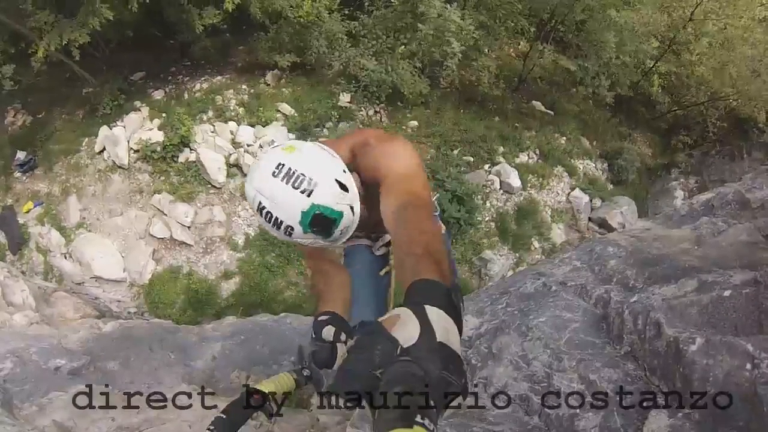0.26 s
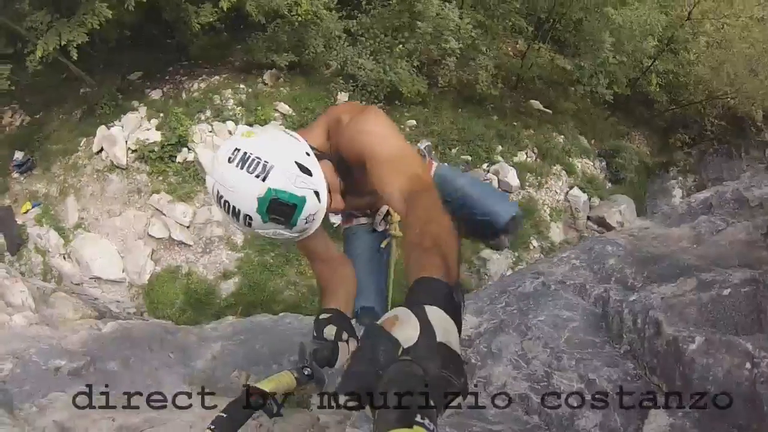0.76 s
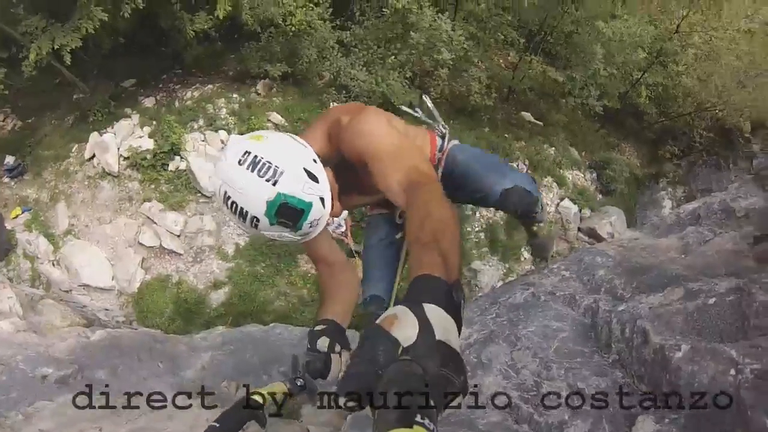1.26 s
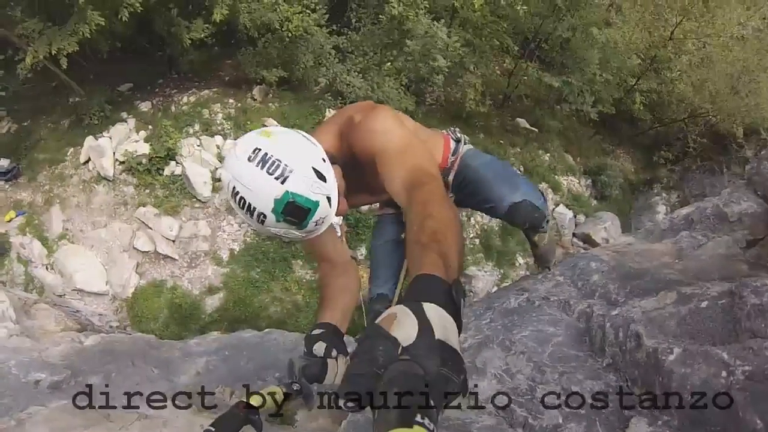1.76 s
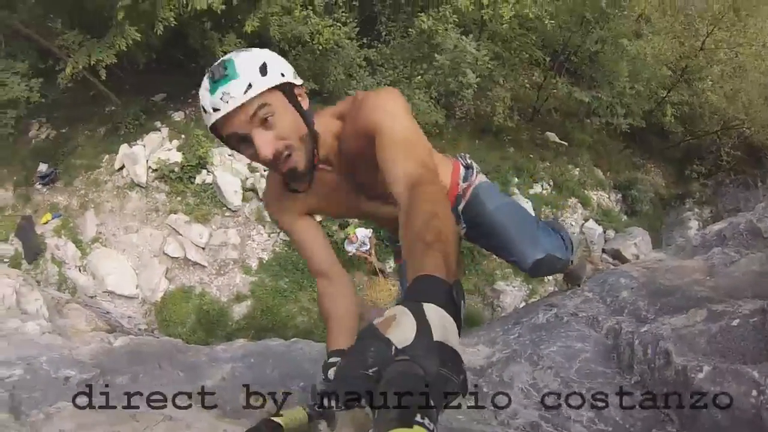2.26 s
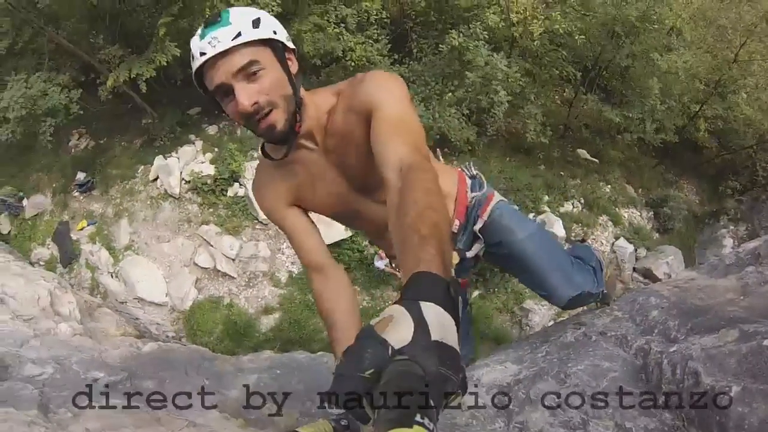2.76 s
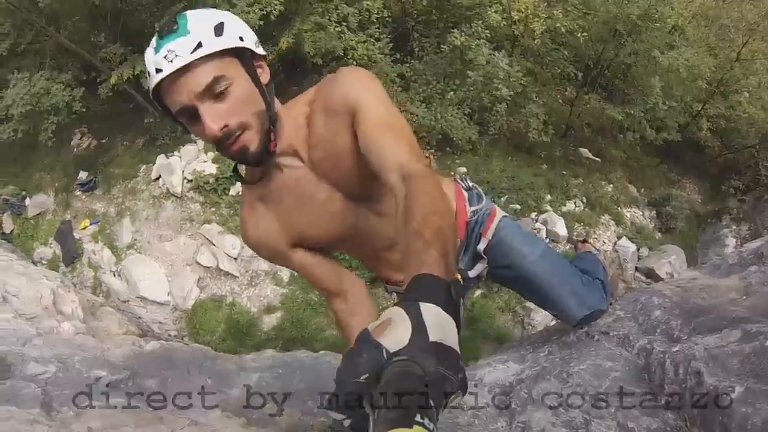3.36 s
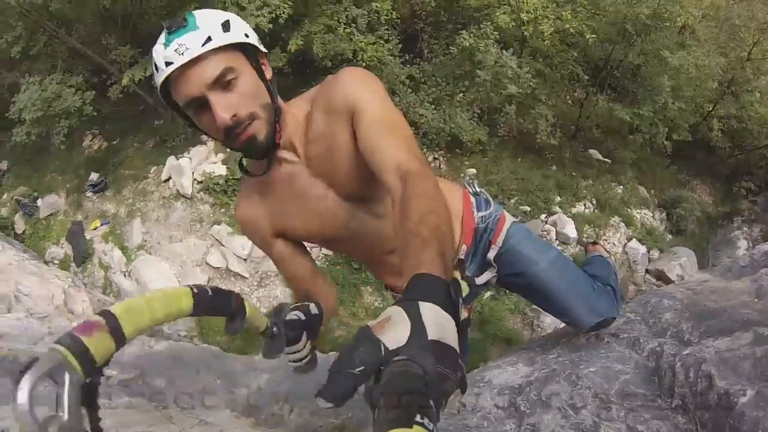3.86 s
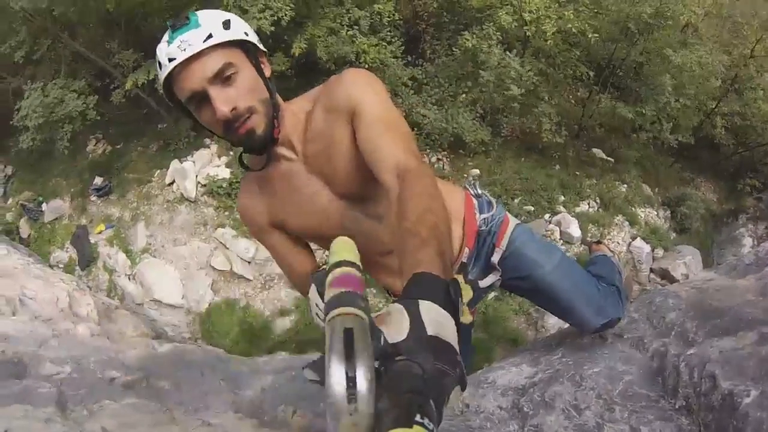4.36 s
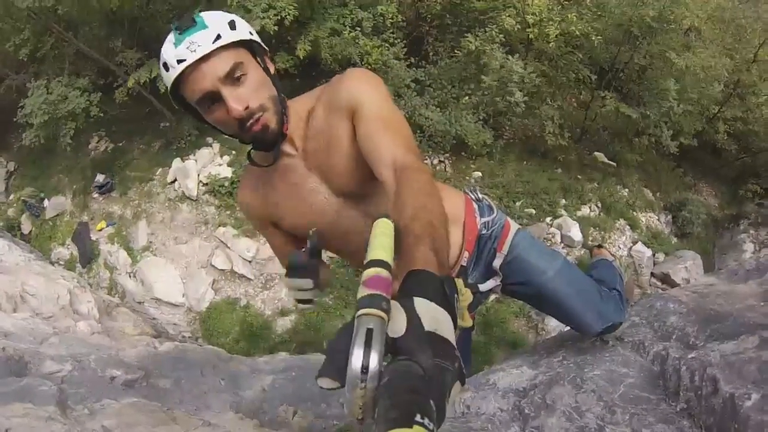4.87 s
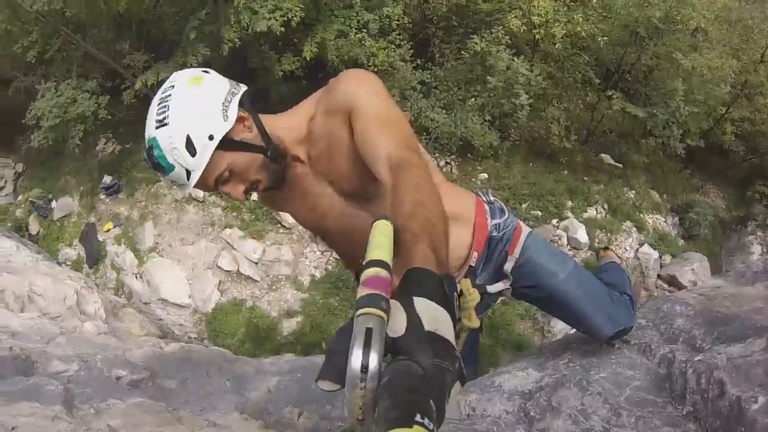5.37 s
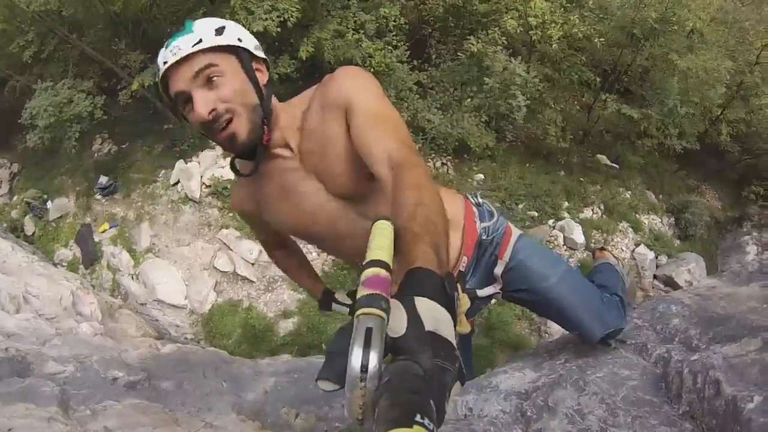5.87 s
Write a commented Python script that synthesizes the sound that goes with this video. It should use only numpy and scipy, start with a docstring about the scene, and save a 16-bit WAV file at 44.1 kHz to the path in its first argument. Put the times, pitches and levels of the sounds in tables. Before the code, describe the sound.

Faint shoe scuffs, taps and hardware ticks over low wind rumble, then a metal climbing tool slams into rock with a loud clack and rattle.

```python
"""A small camera rides on a climbing tool hooked into a rock face, so knocks reach it through the shaft.
Wind rumbles on the port over the hush of a wooded valley; a shoe squeaks, scuffs and taps for a foothold,
ringing the tool's decaying modes, while cloth rustles and harness hardware and grit tick in filtered noise.
One far bird whistles a gliding sine, then a second tool slams in, skitters and drops flat against the rock;
last a glove slides off its grip, noise rubbed through broad resonances."""
import sys
import numpy as np
from scipy import signal
from scipy.fft import rfft, irfft
from scipy.io import wavfile
from scipy.ndimage import uniform_filter1d

SR = 44100
rng = np.random.default_rng(int(sys.argv[2]) if len(sys.argv) > 2 else 0)


def volts_from_decibels(level):
    """Turn decibel levels (scalar or array-like) into linear amplitude factors."""
    exponent = np.asarray(level, float) / 20
    return 10 ** exponent


def generate_wav(signal):
    """Clip the signal to [-1, 1] and save it as 16-bit WAV at the path in sys.argv[1]."""
    frames = np.transpose(np.atleast_2d(signal))
    scaled = np.clip(frames, -1, 1) * 32767
    pcm = np.round(scaled).astype(np.int16)
    wavfile.write(sys.argv[1], SR, pcm)


N = 269892
T = np.arange(N) / SR

# modes of the shaft: pitch_hz, relative_level_db, nominal_t60_s
SHAFT = [(585, -21.5, 0.025), (792.7, 5.5, 0.035), (890, 0.5, 0.034), (1031, -6.5, 0.024)]
# low thud of tool and mount: pitch_hz, relative_level_db, nominal_t60_s
THUD = [(272.5, -3.5, 0.032), (325, -1, 0.054), (391.6, -4.5, .052), (461, -4.5, 0.022)]
# clack of the pick: pitch_hz, relative_level_db, nominal_t60_s
PICK = [(1147, -4.5, 0.017), (1488, -2.5, 0.012), (1595, 3, 0.021), (1795, 1.5, 0.014), (1900, 1.5, 0.016),
        (2234, -0.5, 0.014), (2430, -2, 0.014), (2540, -7.5, 0.014), (2787, -6, 0.01306), (3125, -7, 0.011),
        (4747, -18, .014)]
# the second tool slams in tip first: start_s, shaft_db, thud_over_shaft_db, clack_over_shaft_db, contact_ms
BLOWS = [(4.3884, -13, -2, 1, 0.69), (4.3944, -14, -20, 1, .6), (4.399, -30, -17, 4, 0.51)]
# its shaft drops flat on the rock: start_s, shaft_db, clack_over_shaft_db, sustain_factor, favoured_shaft_hz
BUMPS = [(4.6055, -17.5, -17.5, 0.82, 870), (4.7916, -27, -14.5, 1.44, 1023)]
# pitch around which a dry tick is brightest, of harness parts and of grit as bright as they are
BUCKLE_HZ, CLIP_HZ, GATE_HZ = 5340, 7100, 10030
SHOE_PICK_HZ = 1740  # shoes favour the middle of the pick
BLOW_GRIT_DB = -12.0  # grit under the clack, for blows and flat bumps


def blows():
    """Tip-first slams: smooth pushes favour the top of the shaft ring and the lowest thud modes."""
    return sum(knock(start_s, shaft_db, shaft_db + thud_db, shaft_db + clack_db,
                     shaft_db + clack_db + BLOW_GRIT_DB, ms, kind="clean", shaft_hz=1074, thud_hz=310)
               for start_s, shaft_db, thud_db, clack_db, ms in BLOWS)


def skitter():
    """The tip skips over the rock: each skip clacks some pick modes and barely stirs the shaft."""
    # start_s, clack_db, contact_ms, favoured_pick_hz
    skips = [(4.407, -20, 0.77, 2200), (4.4107, -34, 1.5, 1580), (4.4265, -20.5, 0.7, 2300),
             (4.4361, -28.5, .6, 2300), (4.453, -22.5, 0.61, 2300), (4.4558, -25, 1.2, 1500),
             (4.4592, -29, .8, 4600), (4.4751, -23.5, 0.87, 2010), (4.495, -33.5, 1.5, 1500),
             (4.501, -38, 2.5, 2200), (4.507, -48, 1.5, 1700), (4.516, -39, 2.1, 1500),
             (4.533, -51, 1.3, 1920), (4.572, -56, 1.8, 1690), (4.627, -44, 2.1, 1700),
             (4.642, -44.5, 1.3, 1510), (4.659, -50, 4.9, 1700), (4.667, -50, 3.3, 2100),
             (4.694, -47, 3.7, 1910)]
    return sum(knock(start_s, db - 20.5, db - 33, db, db - 23, ms, pick_hz=hz, onset=0.15)
               for start_s, db, ms, hz in skips)


def flat_bumps():
    """The shaft drops flat: it bends the other way from a blow and rattles longer."""
    return sum(knock(start_s, shaft_db, shaft_db - 5, shaft_db + clack_db, shaft_db + clack_db + BLOW_GRIT_DB,
                     0.28, sustain=sustain, kind="flat", shaft_hz=hz, thud_hz=393)
               for start_s, shaft_db, clack_db, sustain, hz in BUMPS)


def mount_sway():
    """The mount sways in low modes after the first blow and the flat bumps, for less time the softer they are."""
    # pitch_hz, relative_level_db, nominal_t60_s
    mount = [(53.4, -8, .3), (80.5, 0.5, 0.21), (122, -2.5, .12)]
    out = np.zeros(N)
    first_db = BLOWS[0][1]
    for start_s, shaft_db, *_ in BLOWS[:1] + BUMPS:
        sway = ring(mount, spread_db=1.5, sustain=volts_from_decibels(0.63 * (shaft_db - first_db)))
        add(out, start_s, sway, shaft_db - 18)
    return out


def shoe_taps():
    """Shoe taps felt through the rock: rough contacts ring the same tool."""
    # start_s, shaft_db, clack_over_shaft_db, contact_ms
    steps = [(.371, -54.5, -6, 3.2), (.442, -46.5, -12, 2.4), (0.466, -40.5, -7.5, 1.45),
             (.498, -44.5, 3, 2.1), (.827, -49.5, -12, 3), (1.100, -38.5, -7, 4.6), (1.12, -54.5, -20, 3.4),
             (1.178, -53, -11, 4.7), (1.193, -51.5, -6.5, 2.8), (1.264, -63, 5, 4.2),
             (1.368, -30.5, -17, 3.1), (1.379, -29.5, -14.5, 2.5), (1.498, -40, -8, 5.8),
             (1.668, -35.5, -2.5, 2.4), (1.73, -56, -6, 3.2), (1.743, -51.5, -6, 3),
             (1.777, -40.5, -10, 1.7), (1.786, -50, 1.5, 4.7), (1.855, -30.5, -11, 2.17),
             (3.275, -56, -6, 3.1)]
    return sum(knock(start_s, shaft_db, shaft_db - 8.5, shaft_db + clack_db, shaft_db + clack_db - 19.5,
                     ms, pick_hz=SHOE_PICK_HZ)
               for start_s, shaft_db, clack_db, ms in steps)


def scuffs():
    """Rubber catching and slipping on rock: grains come in lumps and ring the same modes."""
    # peak_s, rise_ms, fall_ms, shaft_db, clack_over_shaft_db
    drags = [(.52, 77, 110, -69.5, 2), (.586, 13, 15, -65, 11.5), (0.604, 20.4, 36.3, -40.5, -8),
             (0.845, 26, 34.5, -44.5, -12), (.885, 19, 45, -61.5, -6.5), (1.374, 19, 22, -43.5, -7.5),
             (2.12, 31, 51, -62, -6.5), (2.43, 210, 170, -70, -2.5)]
    grains = rng.standard_normal(N) * volts_from_decibels(1.3 * rng.exponential(size=N)) * lumps(3.5, spread_db=4.5)
    pick_ring = ring(PICK, sustain=1.35, near_hz=SHOE_PICK_HZ, off_db=-22)
    shaft, thud, pick = [unit(signal.fftconvolve(grains, response)[:N])
                         for response in (ring(SHAFT), ring(THUD), pick_ring)]
    body = shaft + volts_from_decibels(-10.5) * thud
    tip = pick + volts_from_decibels(-12.5) * unit(band(grains, 4150, 5060))
    return sum(swell(peak_s, rise_ms, fall_ms, db, bend=1.6) * (body + volts_from_decibels(clack_db) * tip)
               for peak_s, rise_ms, fall_ms, db, clack_db in drags)


def glove():
    """Grainy rubbing through the broad resonances of the grip."""
    # peak_s, rise_ms, fall_ms, level_db
    slide = (4.92, 74, 60, -54.5)
    # centre_hz, width_hz, relative_level_db
    grip = [(905, 205, 6), (1056, 170, 2.5), (1220, 57, -0.5), (1800, 230, -7), (2900, 330, -16),
            (4420, 410, -7.5), (5060, 450, -6.5), (6100, 400, -13.5), (6980, 430, -16),
            (10100, 5400, -24.5)]
    rub = rng.standard_normal(N) * lumps(1.7, spread_db=2.0)
    rung = sum(volts_from_decibels(db) * band(rub, hz - width / 2, hz + width / 2) for hz, width, db in grip)
    return swell(*slide, bend=2.6) * unit(rung)


def dry_ticks():
    """Dry bright ticks: harness hardware, and grit crackling under scuff, blows, skips and bumps."""
    # start_s, peak_db, brightest_hz
    ticks = [(0.7247, -50, GATE_HZ), (0.752, -51.5, BUCKLE_HZ), (.769, -51.5, GATE_HZ),
             (0.9262, -50.5, BUCKLE_HZ), (0.996, -63, BUCKLE_HZ), (1.094, -57, CLIP_HZ),
             (1.126, -52.5, GATE_HZ), (1.372, -47, BUCKLE_HZ), (1.416, -56.5, BUCKLE_HZ),
             (1.502, -45.5, BUCKLE_HZ), (1.532, -56, BUCKLE_HZ), (1.547, -59, CLIP_HZ),
             (1.559, -51, GATE_HZ), (1.574, -45, BUCKLE_HZ), (1.792, -58.5, CLIP_HZ),
             (2.015, -66, BUCKLE_HZ), (2.18, -63, BUCKLE_HZ), (2.439, -67, BUCKLE_HZ),
             (2.579, -61, BUCKLE_HZ), (2.61, -61.5, BUCKLE_HZ), (3.0724, -55, CLIP_HZ),
             (3.094, -54.5, BUCKLE_HZ), (3.1713, -59, BUCKLE_HZ), (3.2, -54.5, BUCKLE_HZ),
             (3.296, -54.5, BUCKLE_HZ), (3.3484, -65, CLIP_HZ), (3.943, -52.5, CLIP_HZ),
             (4.0086, -47.5, BUCKLE_HZ), (4.0243, -56, BUCKLE_HZ), (4.118, -64, BUCKLE_HZ),
             (4.418, -45, CLIP_HZ), (4.4707, -45, CLIP_HZ), (4.642, -44, CLIP_HZ), (4.607, -37, GATE_HZ),
             (4.616, -47.5, CLIP_HZ), (4.624, -65, GATE_HZ), (4.734, -62, CLIP_HZ), (4.749, -68, GATE_HZ),
             (4.794, -50.5, GATE_HZ), (4.8, -55, GATE_HZ), (4.805, -51, CLIP_HZ), (5.1126, -64, BUCKLE_HZ),
             (5.5192, -62, CLIP_HZ), (5.651, -61.5, BUCKLE_HZ), (5.813, -53, GATE_HZ),
             (5.872, -56.5, CLIP_HZ), (5.925, -60.5, CLIP_HZ)]
    out = np.zeros(N)
    for start_s, db, hz in ticks:
        force = contact(6.4, rough=3.3, swell=0.14)
        broad = band(force, 0.5 * hz, 10500)
        bright = band(force, 0.9 * hz, 1.1 * hz)
        add(out, start_s, broad + volts_from_decibels(-1.5) * bright, db)
    return out


def thin_tones():
    """A short squeak near 1.1 kHz, then faint thin high tones: single modes stirred by a soft contact."""
    # start_s, peak_db, pitch_hz, nominal_t60_s
    tones = [(0.404, -53, 1125, 0.086), (1.128, -74, 10800, .08), (1.157, -73, 7460, 0.1),
             (1.180, -73, 9350, 0.11), (1.200, -70, 9330, 0.067), (3.297, -65.5, 5480, 0.043),
             (4.006, -56, 5330, 0.026), (4.165, -80, 9300, 0.052)]
    out = np.zeros(N)
    for start_s, db, hz, t60 in tones:
        add(out, start_s, signal.fftconvolve(contact(5.1, rough=1.2), ring([(hz, 0, t60)])), db)
    return out


def cloth():
    """Cloth and webbing moving over a faint steady rustle: bright, patchy noise."""
    # peak_s, rise_ms, fall_ms, level_db
    rustles = [(.52, 310, 1300, -80), (1.05, 370, 720, -85.5), (1.6, 150, 84, -69.5),
               (3.13, 130, 360, -80.5), (4.04, 64, 80, -72), (5.8, 800, 300, -88)]
    grains = rng.standard_normal(N) * lumps(3.5, spread_db=4.5)
    moving = volts_from_decibels(-95) + sum(swell(*row, bend=0.86) for row in rustles)
    return moving * unit(band(grains, 3320, 12546))


def rumble():
    """Slow wind pressure on the port and weight shifts jolting the mount, both gusting together."""
    # time_s, level_db of the deep part before gusting
    wind_curve = [(0, -55), (.31, -55), (.54, -69), (.78, -64.5), (1.7, -62.5), (1.94, -77), (2.06, -63.5),
                  (2.81, -67.5), (3.77, -75.5), (4.33, -65.5), (4.91, -77.5), (6.12, -74)]
    # peak_s, fade_ms, thump_db before gusting, sway_over_thump_db
    jolt_rows = [(0.608, 64, -44, -23), (.85, 93, -50.5, -0.5), (2.861, 52, -64.5, 6),
                 (4.43, 170, -42, -10), (4.631, 58, -48, 4), (4.79, 140, -63.5, -10)]
    deep = coloured([(10, -4.5), (25, 1), (50, -0.5), (80, -32.5), (200, -69.5)])
    thump = coloured([(30, -22.0), (64, 11.0), (100, 4.0), (160, -9), (300, -42.5), (600, -124)])
    wind = curve_gain(wind_curve, 1) * (deep + volts_from_decibels(-6.5) * thump)
    jolts = sum(swell(peak_s, 25, fade_ms, db, bend=1.1) * (thump + volts_from_decibels(sway_db) * deep)
                for peak_s, fade_ms, db, sway_db in jolt_rows)
    return lumps(66.0, spread_db=-1.5) * (wind + jolts)


def bird():
    """A thin far whistle: a gliding sine, wavering in level as it crosses the trees."""
    # time_s, pitch_hz, level_db
    call = [(3.70, 2620, -94), (3.73, 2740, -84), (3.755, 2790, -74), (3.785, 2700, -85),
            (3.805, 2780, -77), (3.825, 2760, -94), (3.845, 2490, -89), (3.87, 2430, -85),
            (3.92, 2330, -90)]
    time_s, hz, _ = np.transpose(call)
    waver = 1 + 0.25 * unit(uniform_filter1d(rng.standard_normal(N), 700))
    whistle = np.sin(2 * np.pi * np.cumsum(np.interp(T, time_s, hz)) / SR)
    return np.sqrt(2) * curve_gain(call, 2) * waver * whistle


def valley():
    """Steady hush of the wooded valley: noise that thins towards the treble."""
    # pitch_hz, relative_level_db
    colour = [(30, -10), (80, 1), (300, 3), (500, -3.5), (850, -2.5), (1300, -7.5), (2000, -13.5),
              (2450, -21.5), (2800, -14.5), (3500, -21), (4500, -20.5), (5300, -22), (6300, -26.5),
              (12600, -31.5), (13100, -50.5)]
    return volts_from_decibels(-67) * coloured(colour)


def knock(start_s, shaft_db, thud_db, pick_db, grit_db, ms, sustain=0.85, kind="rough",
          shaft_hz=None, thud_hz=None, pick_hz=None, onset=0.86):
    """A blow rings shaft and mount; the tip chatters on a little longer, ringing the pick and crushing grit."""
    out = np.zeros(N)
    flat = kind == "flat"
    blow = contact(ms, rough=4.87, swell=onset)
    chatter = contact(ms + (9.6 if flat else 3.5), rough=3.3, swell=0.4)
    weight = blow if kind == "rough" else push(ms)
    if flat:
        weight = band(weight, 225, 1380)  # a softer landing
    # low modes an octave off the favoured pitch lose 61.5 dB
    shaft = ring(SHAFT, spread_db=2.5, sustain=sustain, near_hz=shaft_hz, off_db=-61.5)
    thud = ring(THUD, spread_db=1.5, sustain=sustain, near_hz=thud_hz, off_db=-61.5)
    pick = ring(PICK, spread_db=5.5, near_hz=pick_hz)
    way = -1 if flat else 1  # which way the shaft bends
    add(out, start_s, way * signal.fftconvolve(weight, shaft), shaft_db)
    add(out, start_s, signal.fftconvolve(weight, thud), thud_db)
    add(out, start_s, signal.fftconvolve(blow + volts_from_decibels(-3.0) * chatter, pick), pick_db)
    add(out, start_s, grit(chatter + volts_from_decibels(-5.0) * blow), grit_db)
    return out


def ring(modes, spread_db=0.0, sustain=0.86, near_hz=None, off_db=-17.5):
    """Decaying modes, levels varied at random; off_db is the change one octave from the favoured near_hz."""
    hz, db, t60 = np.transpose(modes)[:, :, None]
    t = np.arange(int(SR * max(t60.max(), 0.1))) / SR
    db = db + spread_db * rng.standard_normal(hz.shape)
    if near_hz:
        db = db + off_db * np.log2(hz / near_hz) ** 2
    decay = np.exp(-np.log(1000) * t / np.maximum(sustain * t60, 0.003))
    rung = np.sum(volts_from_decibels(db) * np.sin(2 * np.pi * hz * t) * decay, axis=0)
    return band(rung, 0.71 * hz.min(), 1.28 * hz.max())


def contact(ms, rough, swell=0.95):
    """Force of a contact, rms 1: uneven grains that swell (1 = softly, 0 = at once) and fade on a scale of ms."""
    u = np.arange(1, 2049) / (SR * max(ms, 0.2) / 1000)
    grains = rng.standard_normal(2048) * volts_from_decibels(rough * rng.exponential(size=2048))
    return unit(grains * u ** swell * np.exp(-u * 2))


def push(ms):
    """Force of one clean blow, rms 1: a smooth bump lasting ms."""
    u = np.arange(2048) / (SR * ms / 1000)
    return unit(np.sin(np.pi * np.minimum(u, 1)) ** 2)


def grit(grains):
    """Crushed rock dust: a dry crackle falling off towards the top."""
    return band(grains, 4000, 7290) + volts_from_decibels(-11.5) * band(grains, 6400, 10966)


def lumps(ms, spread_db):
    """Gain that glides to a new random level every few ms."""
    k = int(SR * ms / 1000)
    held = rng.standard_normal(N)[np.arange(N) // k]
    return volts_from_decibels(spread_db * uniform_filter1d(held, k))


def swell(peak_s, rise_ms, fall_ms, db, bend):
    """Gain peaking at peak_s, 20 dB lower rise_ms before and fall_ms after; bend 1 = pointed, 2 = round."""
    u = np.abs(T - peak_s) * 1000 / np.where(T < peak_s, rise_ms, fall_ms)
    return volts_from_decibels(db - np.minimum(20 * u ** bend, 200))


def curve_gain(rows, col):
    """Gain over time from a dB column, all but silent (-150 dB) outside the rows."""
    rows = np.array(rows)
    return volts_from_decibels(np.interp(T, rows[:, 0], rows[:, col], left=-150, right=-150))


def coloured(points):
    """Noise of rms 1 with the given spectrum: pitch_hz, relative_level_db."""
    hz, db = np.transpose(points)
    f = np.maximum(np.fft.rfftfreq(N, 1 / SR), 1)
    shape = volts_from_decibels(np.interp(np.log(f), np.log(hz), db))
    return unit(irfft(rfft(rng.standard_normal(N)) * shape, N))


def band(x, lo_hz, hi_hz):
    """Band-pass, 12 dB per octave on each side, edges held within 20 to 15000 Hz."""
    edges = np.clip([lo_hz, hi_hz], 20, 15000)
    return signal.sosfilt(signal.butter(2, edges, "bandpass", fs=SR, output="sos"), x)


def unit(x):
    """Scale to rms 1."""
    return x / np.sqrt(np.mean(x ** 2))


def add(out, start_s, sound, peak_db):
    """Place a sound at start_s with the given peak."""
    i = int(start_s * SR)
    sound = sound[:N - i]
    out[i:i + len(sound)] += sound * volts_from_decibels(peak_db) / np.abs(sound).max()


def scene():
    """All sources at one microphone in the open air, with no room to answer."""
    second_tool = blows() + skitter() + flat_bumps() + mount_sway()
    climber = shoe_taps() + scuffs() + glove() + cloth()
    small_sounds = dry_ticks() + thin_tones()
    surroundings = rumble() + bird() + valley()
    return (second_tool + climber + small_sounds + surroundings)[None]


def top_cut(x):
    """Nothing passes above the cut-off."""
    return signal.sosfilt(signal.butter(12, 15730, fs=SR, output="sos"), x)


def record(dry):
    """The camera's housing dulls the very top before the microphone."""
    dull = signal.sosfilt(signal.butter(4, 13800, fs=SR, output="sos"), dry)
    return top_cut(dull)


dry = scene()
out = record(dry)
generate_wav(out)
```